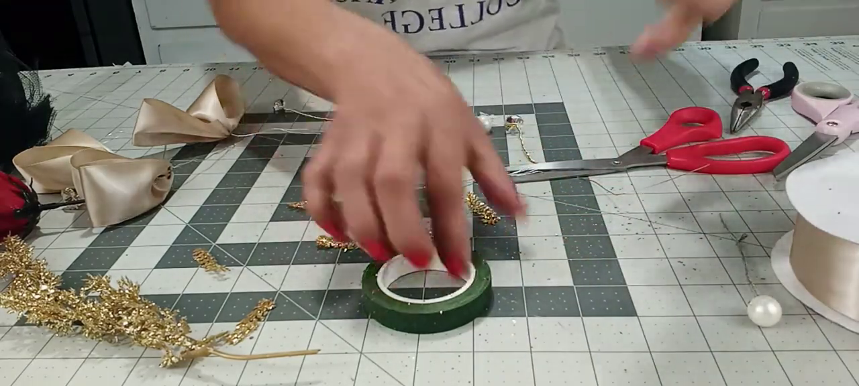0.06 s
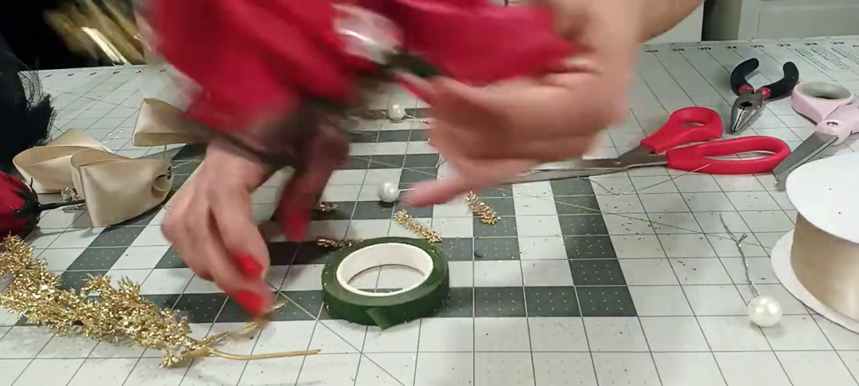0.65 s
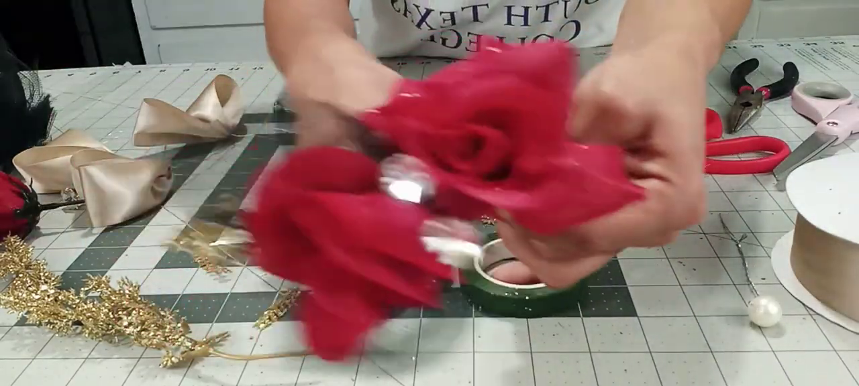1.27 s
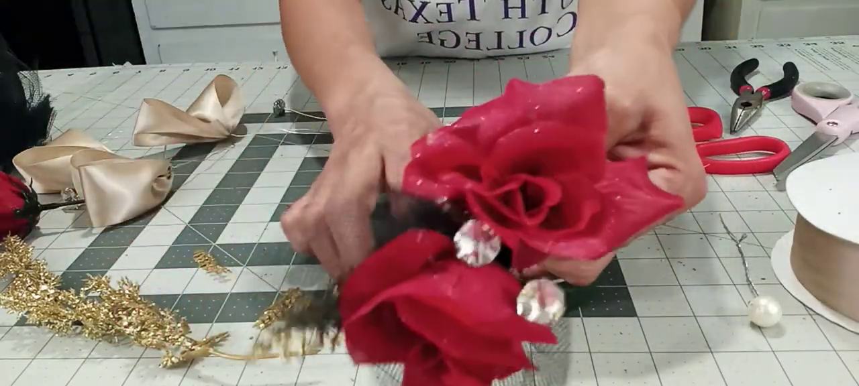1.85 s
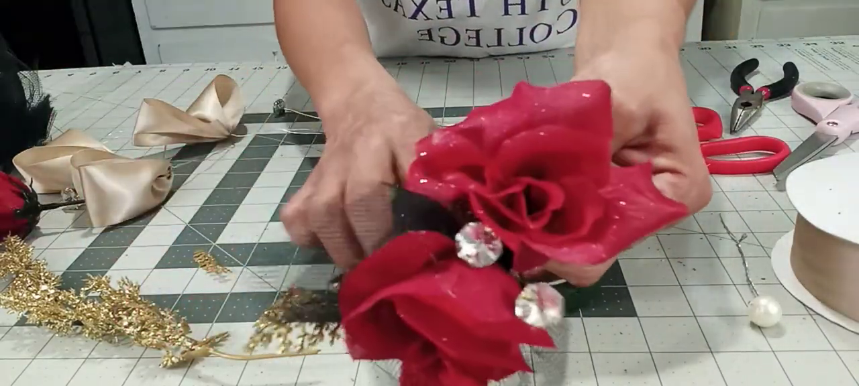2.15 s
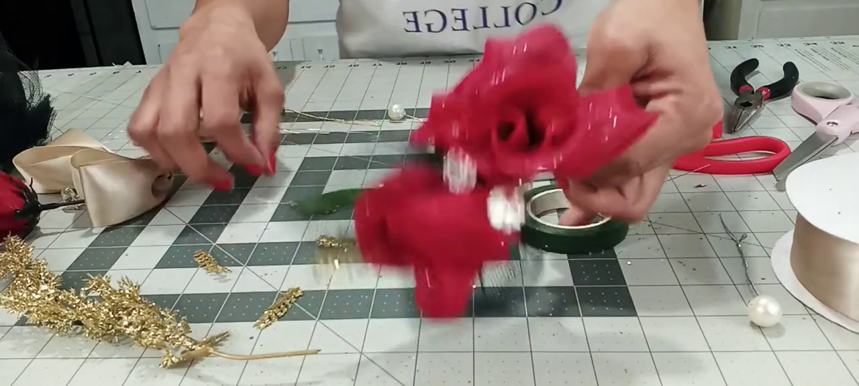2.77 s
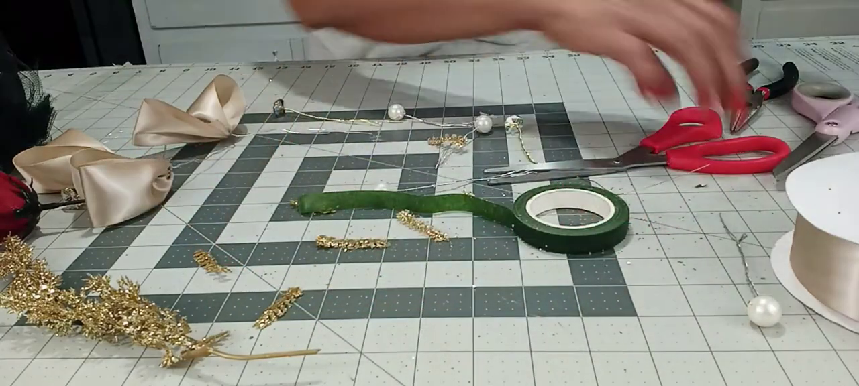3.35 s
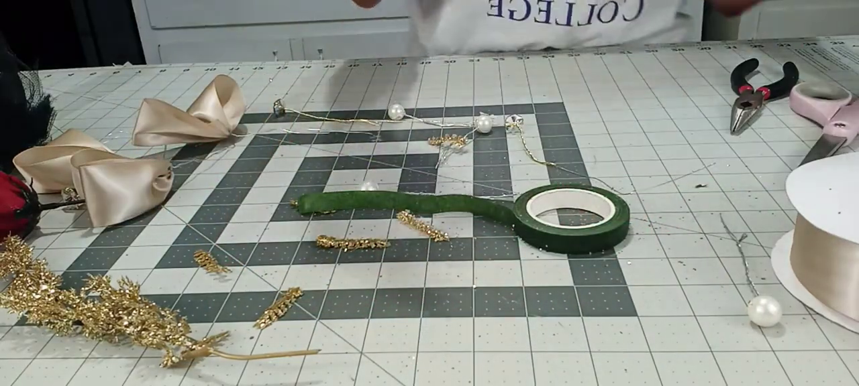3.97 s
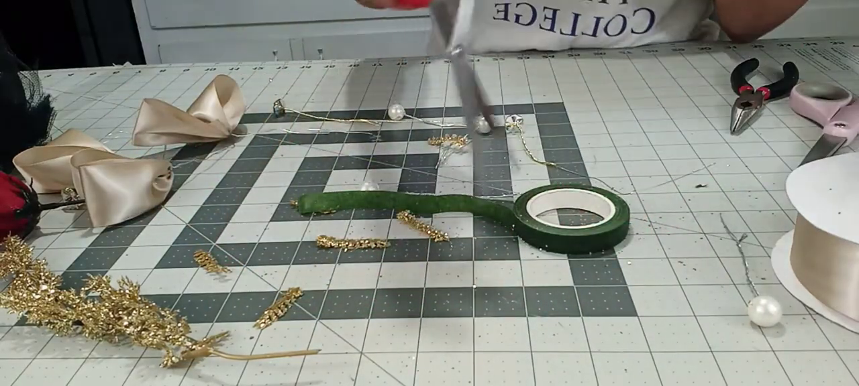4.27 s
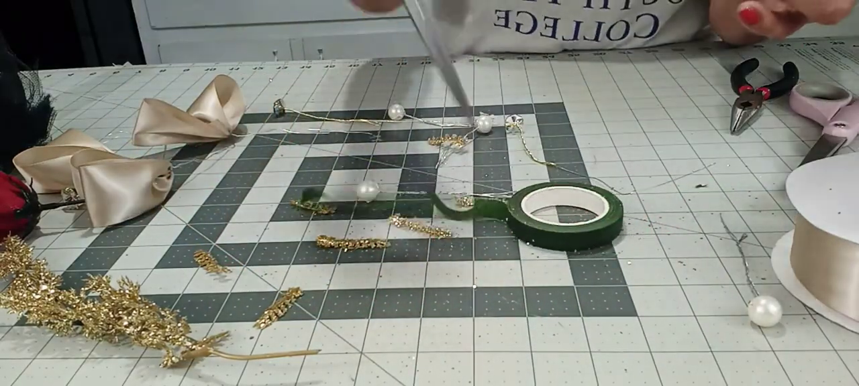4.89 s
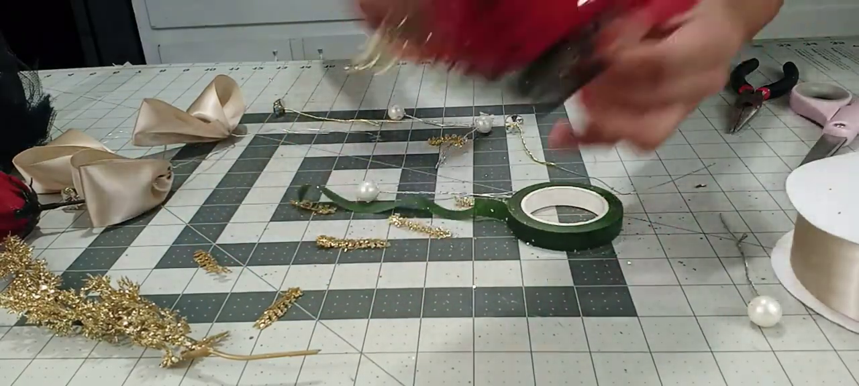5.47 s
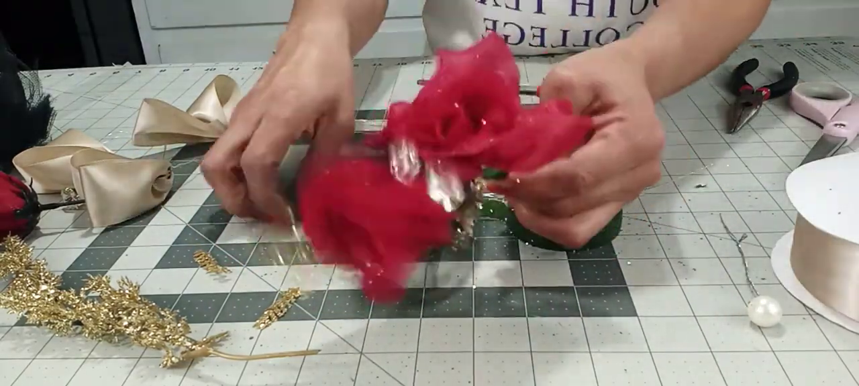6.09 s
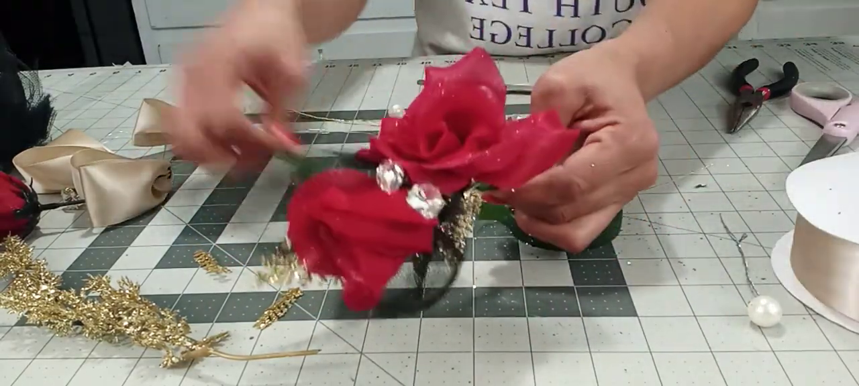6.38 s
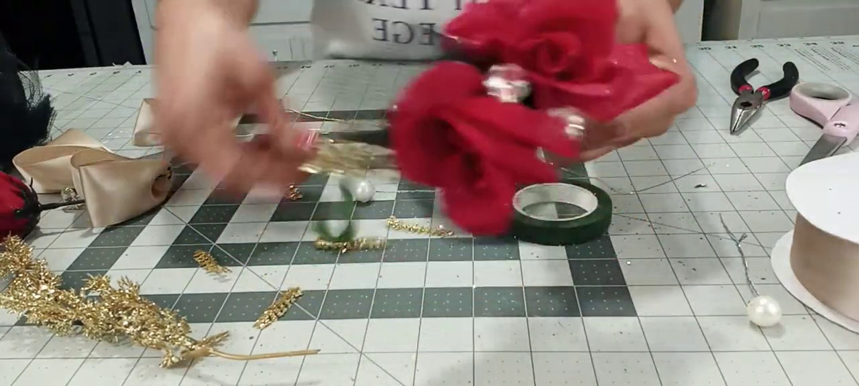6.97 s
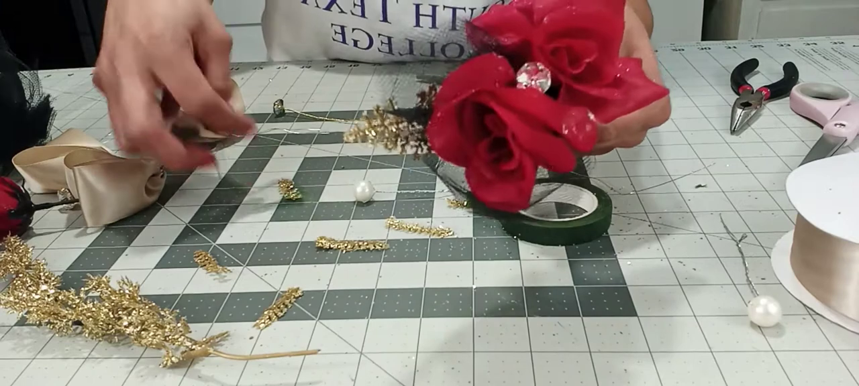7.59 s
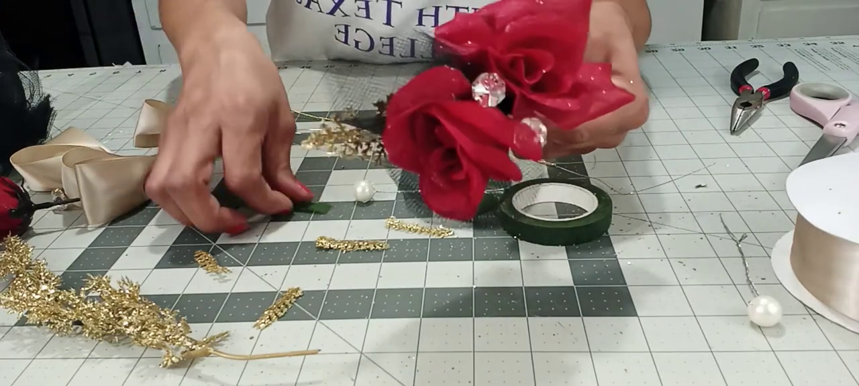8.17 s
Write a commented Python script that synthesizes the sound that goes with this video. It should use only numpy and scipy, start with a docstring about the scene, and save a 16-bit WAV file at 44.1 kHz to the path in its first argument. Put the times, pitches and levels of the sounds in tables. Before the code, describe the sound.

Artificial flowers rustle in irregular bursts, with sticky tape peeling and ripping and tools clattering on a craft table indoors.

```python
"""Floral tape peels off its roll with crackling glue and falling squeaks, then is pulled in two sharp rips.
It is for a corsage of fabric roses and tinsel sprigs, which crinkle, brush and snap as they are handled.
The roll, scissors and hands knock and slide on a craft table, ringing its top and their own hard parts.
A small room answers, and still air and a faint mains hum lie underneath."""
import sys
import numpy as np
from scipy import signal
from scipy.fft import rfft, irfft, next_fast_len
from scipy.io import wavfile
from scipy.ndimage import uniform_filter1d, map_coordinates

SR = 44100
rng = np.random.default_rng(int(sys.argv[2]) if len(sys.argv) > 2 else 0)


def waveform_to_disk(signal):
    """Save audio, clipped to [-1, 1], as 16-bit WAV at the path in sys.argv[1]."""
    frames = np.transpose(np.atleast_2d(signal))
    scaled = np.clip(frames, -1, 1) * 32767
    samples = np.round(scaled).astype(np.int16)
    wavfile.write(sys.argv[1], SR, samples)


N = 363384


# Tone of the snapping glue. Each row: frequency in Hz, level in dB.
GLUE_TONE = [(90, -25), (230, 3.5), (700, 6), (1400, 8.5), (2500, -0.5), (6000, 1.5), (10000, 8.5),
             (16000, 5.5)]
# Squeaks of the stretched strip. Each row: start and length in seconds, first and last pitch in Hz,
# level in dB.
TAPE_SQUEAKS = [(1.974, 0.13, 950, 350, -49.5), (1.978, 0.047, 1450, 1060, -47),
                (2.005, 0.061, 1785, 1473, -47.5), (2.058, .15, 412, 204, -52.5),
                (2.066, 0.063, 1317, 1025, -45), (2.133, 0.093, 895, 455, -53),
                (2.151, .07, 1477, 858, -47), (2.139, 0.051, 2140, 1930, -51),
                (2.238, 0.117, 856, 648, -54.5), (2.326, 0.082, 492, 412, -57.5)]
def tape_peel():
    """Glue threads snap one after another; the strip squeaks lower as its free length grows."""
    out, t = np.zeros(N), np.arange(SR // 2) / SR
    crackle = clumps(GLUE_TONE, len(t), rate=7000, spread_db=1, clump_rate=260, clump_db=1.4)
    pull = effort(t, attack=0.026, hold=0.17, t60=0.58)
    add(out, 1.975, amp(-33.5) * pull * crackle)
    for start, length, first_hz, last_hz, db in TAPE_SQUEAKS:
        size = int(length * SR)
        pitch = np.geomspace(first_hz, last_hz, size) * (1 + 0.02 * wobble(410, size))
        swell = signal.windows.tukey(size, 0.7) * amp(3 * wobble(150, size))
        squeak = np.sin(2 * np.pi * np.cumsum(pitch) / SR)
        add(out, start, amp(db) * unit(swell * squeak))
    return out


# Tone of a rip, scooped in the mids. Each row: frequency in Hz, level in dB.
RIP_TONE = [(150, 2), (600, -18.5), (2000, -15.5), (3200, -9.5), (4500, -1), (7000, -2), (10000, -2.5),
            (16000, -3)]
# Sharp pulls. Each row: start in seconds, level in dB, hold and t60 in seconds, table tug in dB.
TAPE_PULLS = [(6.367, -23.5, 0.056, 0.33, -41), (6.791, -20, .025, 0.37, -35.5)]
def tape_rips():
    """A quick pull lets go of a dense spray of tiny snaps and tugs softly at the table."""
    out, t = np.zeros(N), np.arange(SR // 2) / SR
    for start, db, hold, t60, tug_db in TAPE_PULLS:
        spray = unit(coloured(grains(9000, 0.83, len(t)), RIP_TONE))
        tug = unit_hit(np.sin(2 * np.pi * 83 * t) * t * fade(t, 0.26))
        add(out, start, amp(db) * effort(t, 0.0088, hold, t60) * spray + amp(tug_db) * tug)
    return out


# Bright tone of the crinkle. Each row: frequency in Hz, level in dB.
CRINKLE_TONE = [(100, -44.5), (700, -22.5), (1200, -7), (2200, 2.5), (4000, 5.5), (6500, 7), (10000, 5.5),
                (16000, 4.5)]
# Moves of the corsage and tape. Each row: start and hold in seconds, level in dB.
CRINKLE_MOVES = [(0.0, 0.041, -44.5), (0.07, 0.14, -57.5), (0.43, 0.12, -61), (0.66, 0.068, -49.5),
                 (0.78, 0.15, -72), (1.35, 0.036, -71), (2.06, 0.24, -47), (3.05, 0.13, -49),
                 (3.19, 0.19, -45.5), (3.44, 0.12, -59.5), (3.69, 0.24, -47), (4.03, 0.04, -58.5),
                 (4.42, 0.24, -56.5), (5.77, 0.59, -51), (6.45, 0.28, -51.5), (6.88, 0.33, -53),
                 (7.28, 0.28, -54), (7.99, 0.054, -75)]
def petal_crinkle():
    """Petals and tinsel crinkle in clumps as they are moved."""
    motion = movements(CRINKLE_MOVES, attack=0.0051, t60=0.22, rest_db=-87.5)
    return motion * clumps(CRINKLE_TONE, N, rate=6000, spread_db=2, clump_rate=76, clump_db=1.5)


# Tone of fabric on fabric. Each row: frequency in Hz, level in dB.
FABRIC_TONE = [(100, -46.5), (700, -27.5), (1200, -16.5), (2200, -10.5), (4000, -2), (6500, -0.5),
               (10000, -7), (16000, -12)]
# Light brushes. Each row: start and length in seconds, level in dB.
FABRIC_STROKES = [(0.53, 0.023, -40.5), (0.645, 0.039, -40.5), (0.94, 0.048, -55), (1.212, 0.058, -45),
                  (1.46, 0.27, -75), (1.596, 0.023, -46.5), (2.585, 0.033, -58.5), (2.612, 0.045, -46.5),
                  (2.81, 0.055, -63.5), (3.031, 0.063, -50), (3.175, 0.051, -45.5), (3.641, 0.044, -45.5),
                  (4.03, 0.12, -57.5), (4.173, 0.061, -53), (4.22, 0.055, -49.5), (4.45, 0.036, -52.5),
                  (4.64, 0.034, -52), (4.878, 0.11, -65), (4.975, 0.093, -59), (5.12, 0.042, -57.5),
                  (5.148, 0.05, -47.5), (5.768, 0.063, -50), (5.945, 0.028, -48), (6.2, 0.096, -48.5),
                  (6.745, .045, -41), (7.08, 0.036, -45.5), (7.278, 0.044, -53)]
def fabric_brushes():
    """Petals and sleeves brush past each other."""
    return strokes(FABRIC_STROKES, FABRIC_TONE, rate=14000, rise=0.014)


# Tones of a stiff edge and of glinting metal and foil. Each row: frequency in Hz, level in dB.
SNAP_TONE = [(200, -50), (900, -13.5), (2000, -18), (4000, -5), (6500, 3), (10000, -7.5), (16000, -14)]
GLINT_TONE = [(2000, -40), (6000, -15), (9000, -0.5), (12000, 3.5), (16000, 1.5)]
def snap(crack_db, shiver_db, glint_db):
    """A stiff edge flicks free with a crack, then shivers briefly; metal and foil add a high glint."""
    t = np.arange(SR // 5) / SR
    crack = burst(t, 0.0083, SNAP_TONE)
    shiver = unit_hit(coloured(grains(5000, 2.1, len(t)) * fade(t, 0.2), SNAP_TONE))
    glint = burst(t, 0.011, GLINT_TONE)
    return amp(crack_db) * crack + amp(shiver_db) * shiver + amp(glint_db) * glint


# Edges flicking free. Each row: start in seconds, crack and glint levels in dB.
EDGE_FLICKS = [(0.4235, -69, -60.5), (0.5301, -37, -43.5), (0.5373, -43, -54), (1.0883, -64, -67),
               (1.2115, -50.5, -66), (1.221, -48, -66), (1.2373, -49.5, -68), (1.8161, -71, -64),
               (2.463, -67, -58), (3.1789, -44, -52), (3.463, -53, -49), (3.6445, -44.5, -55),
               (3.762, -54.5, -50), (3.788, -54.5, -43), (4.4981, -45, -35.5), (4.6581, -45, -45.5),
               (4.762, -64.5, -54.5), (5.3407, -69.5, -76), (6.1444, -43, -37), (6.796, -43, -43.5),
               (7.1037, -46.5, -55.5), (7.426, -59.5, -45), (7.4412, -66, -55), (8.051, -66, -46)]
def edge_snaps():
    """Petals, tinsel and blades snap on their own; every knock also snaps, in step with its click."""
    out = np.zeros(N)
    for start, crack_db, glint_db in EDGE_FLICKS:
        add(out, start, snap(crack_db, crack_db - 3, glint_db))
    for start, _, _, click_db in TABLE_HITS:
        add(out, start + 0.001, amp(click_db) * snap(crack_db=-11, shiver_db=-9, glint_db=-6.5))
    return out


# Low and middle modes of the table top, and modes of hard plastic and steel parts.
# Each row: frequency in Hz, relative level in dB, t60 in seconds.
THUD_MODES = [(79.5, -18.5, 0.19), (97, -16, 0.28), (170.7, -2.5, 0.12), (189.2, -0.5, .14),
              (235.4, 0, 0.041), (255, -8, .09), (302.2, -6, .13), (347.8, -12, 0.16)]
CLACK_MODES = [(458.8, 5, 0.1), (567, 0.5, 0.061), (627, -6.5, 0.2), (676, -14, 0.11), (817.5, -6.5, 0.15),
               (890, -5, 0.12), (1042, -13, 0.15), (1100, -25.5, 0.066)]
TOOL_MODES = [(1430, -18.5, 0.071), (1444, -1.5, 0.037), (1717, 11.5, 0.019), (1733, -7.5, 0.037),
              (2120, -6.5, 0.035), (2880, -14, 0.013), (3460, -19.5, 0.06)]
# Things set down or bumped. Each row: start in seconds, thud, clack and click levels in dB.
TABLE_HITS = [(0.182, -39.5, -48.5, -68), (0.645, -48, -51, -55.5), (0.669, -34, -41, -48.5),
              (1.088, -56.5, -58.5, -69), (1.6228, -38, -36, -44.5), (2.483, -32, -37.5, -48),
              (3.165, -36, -48, -56), (3.193, -43, -41.5, -44), (3.216, -40, -40.5, -50.5),
              (3.229, -42, -52, -39), (3.299, -39.5, -45.5, -52), (4.2923, -21.5, -25, -44.5),
              (4.504, -33, -56, -58.5), (4.654, -51.5, -83, -65.5), (5.388, -31, -36.5, -33),
              (5.423, -30.5, -34.5, -35), (5.453, -39, -48, -49), (5.469, -22, -25.5, -34),
              (5.505, -24.5, -45.5, -38), (5.536, -32.5, -37, -32), (5.583, -34, -44.5, -32),
              (5.833, -38, -52, -53), (5.855, -36, -48, -62), (6.144, -65, -81, -51),
              (6.604, -36, -34.5, -44.5), (7.284, -41, -59, -66), (7.467, -51.5, -54, -54),
              (7.657, -55.5, -54, -61.5), (7.896, -34, -47, -45)]
def table_knocks():
    """Each contact clicks in the object itself; an instant later the mat clacks and the table top thuds."""
    out, t = np.zeros(N), np.arange(SR // 4) / SR
    push_tone = [(60, -52.5), (200, -8), (500, -3), (1100, 0), (1500, -16.5), (2300, -28.5), (8000, -50)]
    shudder_tone = [(150, -27.5), (450, 8), (1050, -1.5), (1450, -20.5), (2300, -28.5), (8000, -48.5)]
    tick_tone = [(400, -26.5), (1300, 10), (1800, 0.5), (2400, 1.5), (3500, -0.5), (7000, -15),
                 (16000, -21.5)]
    push = unit_hit(coloured(signal.unit_impulse(len(t)), push_tone))
    for start, thud_db, clack_db, click_db in TABLE_HITS:
        thud = ring(THUD_MODES, t, detune=0.0082) * (1 - np.exp(-t / 0.0022))
        shudder = burst(t, 0.09, shudder_tone)
        clack = 0.55 * push + 0.89 * ring(CLACK_MODES, t, detune=0.0059) + 0.29 * shudder
        click = 0.77 * ring(TOOL_MODES, t, detune=0.045) + burst(t, 0.014, tick_tone)
        add(out, start + 0.001, amp(click_db) * click)
        add(out, start + 0.002, amp(thud_db) * thud + amp(clack_db) * clack)
    return out


# Dull tone of rubbing on the mat. Each row: frequency in Hz, level in dB.
RUB_TONE = [(40, -23), (85, -6), (130, 1), (185, 3), (260, 2), (380, 0), (470, 4.5), (700, -2.5),
            (860, 3.5), (1100, -4), (1350, -1), (2200, -11), (5000, -17), (16000, -53)]
# Slides over the mat. Each row: start and hold in seconds, level in dB.
RUB_MOVES = [(0.0, 0.19, -49), (0.52, 0.085, -52), (0.66, 0.094, -50.5), (0.8, 0.23, -68.5),
             (1.23, 0.82, -78.5), (2.18, 0.2, -52), (2.99, 0.18, -64), (3.31, 0.13, -58),
             (5.6, 0.043, -48.5), (5.86, 0.025, -49.5), (6.14, 0.37, -72), (6.37, 0.18, -60),
             (6.7, 0.13, -54), (6.79, 0.085, -52), (7.04, 0.25, -60), (7.3, 0.16, -56.5), (7.5, 0.066, -65)]
def mat_rubs():
    """Hands and tools rub unevenly over the mat."""
    motion = movements(RUB_MOVES, attack=0.005, t60=0.25, rest_db=-82.5)
    return motion * clumps(RUB_TONE, N, rate=1200, spread_db=1.2, clump_rate=45, clump_db=3.6)


# Tone of plastic on the mat. Each row: frequency in Hz, level in dB.
SCRAPE_TONE = [(150, -74), (450, 17.5), (850, 9), (1350, 7.5), (2200, 6.5), (5000, -37), (16000, -36)]
# Short drags. Each row: start and length in seconds, level in dB.
SCRAPE_STROKES = [(0.0, 0.092, -50.5), (0.485, 0.064, -66.5), (0.565, 0.046, -50.5), (0.652, 0.029, -42.5),
                  (3.43, 0.049, -55), (3.52, 0.04, -66), (4.449, 0.06, -43.5), (7.375, 0.048, -52.5)]
def plastic_scrapes():
    """Hard plastic is dragged a short way over the mat."""
    return strokes(SCRAPE_STROKES, SCRAPE_TONE, rate=1700, rise=0.017)


# Tone of the table top under a hand. Each row: frequency in Hz, level in dB.
PRESS_TONE = [(50, -27), (120, -40), (160, 0.5), (185, 16.5), (230, -9), (350, -12), (700, -44),
              (3000, -47)]
# Presses. Each row: start and length in seconds, level in dB.
PRESS_STROKES = [(0.04, 0.041, -49), (0.11, 0.063, -46), (0.56, 0.087, -48), (0.85, 0.16, -62),
                 (2.05, 0.16, -64), (3.18, 0.083, -30.5)]
def hand_presses():
    """Palms and fingers press on the table top, which answers with a low note."""
    return strokes(PRESS_STROKES, PRESS_TONE, rate=3000, rise=0.013)


# Decay of the small room. Each row: frequency in Hz, t60 in seconds.
ROOM_DECAY = [(100, 0.25), (500, 0.25), (2000, 0.38), (6500, 0.42), (10000, .36), (16000, 0.032)]
def room(x, early_db, early_t60, frame=256, sections=36):
    """Nearby clutter answers quickly and the walls longer; the echo's fine grain varies over time."""
    out = np.zeros(N)
    edges = np.linspace(0, N, sections + 1).astype(int)
    for start, end in zip(edges[:-1], edges[1:]):
        hz, t, noise = signal.stft(rng.standard_normal(SR // 2), SR, nperseg=frame)
        decay = fade(t, along(ROOM_DECAY, hz)[:, None]) + amp(early_db) * fade(t, early_t60)
        tail = signal.istft(noise * decay, SR, nperseg=frame)[1]
        add(out, start / SR + 0.002, signal.fftconvolve(x[start:end], tail / np.linalg.norm(tail)))
    return out


# Mains partials and the tone of the air. Each row: frequency in Hz, level in dB.
HUM_PARTIALS = [(120, -67), (240, -78.5)]
AIR_TONE = [(20, 1.5), (50, 9.5), (80, 8.5), (150, 2), (300, -5.5), (600, -12.5), (1500, -21.5),
            (4000, -26.5), (6500, -21.5), (16000, -24)]
def room_tone():
    """Still room air with a faint mains hum."""
    t = np.arange(N) / SR
    hum = sum(amp(db) * unit(np.sin(2 * np.pi * hz * t + 0.15 * wobble(4, N))) for hz, db in HUM_PARTIALS)
    return hum + amp(-67.5) * unit(coloured(rng.standard_normal(N), AIR_TONE))


def grains(rate, spread_db, size):
    """Tiny fractures at random moments, about rate a second, a few much larger than the rest."""
    strength = amp(spread_db * np.minimum(rng.exponential(size=size), 4))
    return unit((rng.random(size) < rate / SR) * strength * rng.standard_normal(size))


def clumps(tone, size, rate, spread_db, clump_rate, clump_db):
    """A crackle of grains whose level flickers, bunching them into clumps."""
    crackle = grains(rate, spread_db, size) * amp(clump_db * wobble(clump_rate, size))
    return unit(coloured(crackle, tone))


def strokes(rows, tone, rate, rise):
    """Fibres catch and slip densely while a stroke swells and eases off."""
    out = np.zeros(N)
    for start, length, db in rows:
        t = np.arange(int(length * SR)) / SR
        pressure = (1 - np.exp(-t / rise)) * np.sqrt(1 - t / length)
        friction = coloured(grains(rate, 1.5, len(t)), tone)
        add(out, start, amp(db) * unit(pressure * friction))
    return out


def effort(t, attack, hold, t60):
    """A movement of the hand builds up, holds and dies away."""
    return (1 - np.exp(-t / attack)) * fade(np.maximum(t - hold, 0), t60)


def movements(rows, attack, t60, rest_db, fidget_db=5.5):
    """A gain curve: separate movements over the faint fidgeting of hands that are never quite still."""
    out, t = amp(rest_db + fidget_db * wobble(7, N)), np.arange(SR) / SR
    for start, hold, db in rows:
        add(out, start, amp(db) * effort(t, attack, hold, t60))
    return out


def flexed(x, depth_db, frame=256):
    """Thin sheets bend as they move, so their resonances come and go."""
    bands = signal.stft(x, nperseg=frame)[2]
    drift = uniform_filter1d(rng.standard_normal(bands.shape), size=4, axis=0)
    drift = uniform_filter1d(drift, size=6, axis=1)
    gain = unit(amp(depth_db * np.clip(unit(drift), -2, 2)))
    return signal.istft(bands * gain, nperseg=frame)[1][:N]


def ring(modes, t, detune):
    """Modes struck at a new spot: new strengths, signs and slightly shifted pitches."""
    hz, db, t60 = np.transpose(modes)[:, :, None]
    strength = amp(db + 0.92 * rng.standard_normal(hz.shape)) * rng.choice([-1, 1], hz.shape)
    pitch = hz * (1 + detune * rng.standard_normal(hz.shape))
    return unit_hit(np.sum(strength * fade(t, t60) * np.sin(2 * np.pi * pitch * t), axis=0))


def burst(t, t60, tone):
    """Many crowded modes dying together."""
    return unit_hit(coloured(rng.standard_normal(len(t)) * fade(t, t60), tone))


def coloured(x, tone, size=4096):
    """x through a minimum-phase EQ drawn by (Hz, dB) points."""
    gain = amp(along(tone, np.fft.rfftfreq(size, 1 / SR)))
    cepstrum = irfft(np.log(gain))
    cepstrum[1:size // 2] *= 2
    cepstrum[size // 2 + 1:] = 0
    impulse = irfft(np.exp(rfft(cepstrum)))
    return signal.fftconvolve(x, impulse)[:len(x)]


def along(points, hz):
    """Read (Hz, value) points along a log frequency axis."""
    point_hz, values = np.transpose(points)
    return np.interp(np.log(hz + 1), np.log(np.sort(point_hz)), values)


def wobble(rate, size):
    """A smooth random curve, rate knots a second."""
    knots = rng.standard_normal(int(size * rate / SR) + 4)
    return map_coordinates(knots, [np.arange(size) * rate / SR])


def fade(t, t60):
    """A decay that loses 60 dB in t60 seconds."""
    return np.exp(-np.log(1000) * t / t60)


def amp(db):
    """Decibels to gain."""
    return 10 ** (np.asarray(db) / 20)


def unit(x):
    """x at rms 1."""
    return x / np.sqrt(np.mean(x ** 2) + 1e-20)


def unit_hit(x):
    """A short sound scaled to the energy of 30 ms at rms 1."""
    return x / np.sqrt(np.sum(x ** 2) / (0.03 * SR) + 1e-20)


def add(track, seconds, sound):
    """Mix a sound into the track at the given time."""
    start = max(0, round(seconds * SR))
    track[start:start + len(sound)] += sound[:max(0, N - start)]


def scene():
    """Tape, corsage and table close by, with the room around them."""
    knocks, snaps = table_knocks(), edge_snaps()
    tape = flexed(tape_peel() + tape_rips(), depth_db=2)
    handling = fabric_brushes() + plastic_scrapes() + hand_presses() + petal_crinkle() + mat_rubs()
    rustle = flexed(handling, depth_db=4)
    table_echo = room(amp(-5) * knocks, early_db=-4, early_t60=0.17)
    reverb_send = amp(-11.5) * tape + amp(-4) * rustle + amp(-6) * snaps
    walls = room(reverb_send, early_db=-9, early_t60=0.12)
    return (tape + rustle + snaps + knocks + table_echo + walls + room_tone())[None]


# Response of the microphone. Each row: frequency in Hz, gain in dB.
MIC_RESPONSE = [(20, -25), (45, -14), (75, -8), (3500, -2), (5200, -1.5), (6900, 4), (7500, -1),
                (8200, -11.5), (9000, -11.5), (10200, -5.5), (11500, -13), (13600, -19), (15200, -3.5),
                (16000, -17.5)]
def record(dry):
    """A small microphone with a peaky treble and a steep band limit."""
    x = coloured(dry[0], MIC_RESPONSE)
    size = next_fast_len(N + SR // 2)
    passband = np.fft.rfftfreq(size, 1 / SR) < 16100  # Hz
    return irfft(rfft(x, size) * passband, size)[None, :N]


dry = scene()
out = record(dry)
waveform_to_disk(out)
```